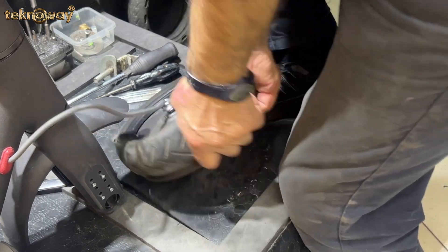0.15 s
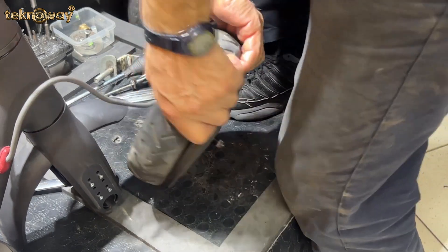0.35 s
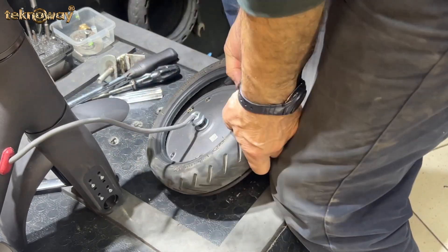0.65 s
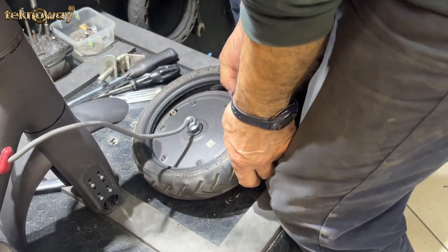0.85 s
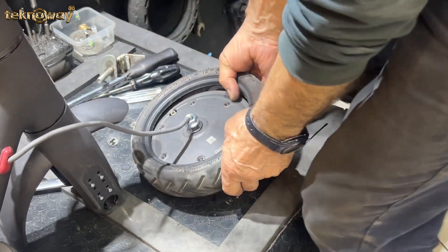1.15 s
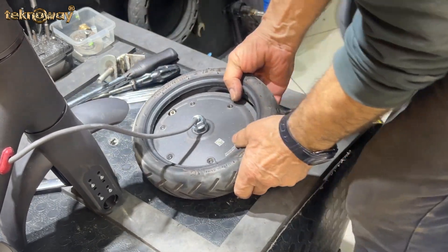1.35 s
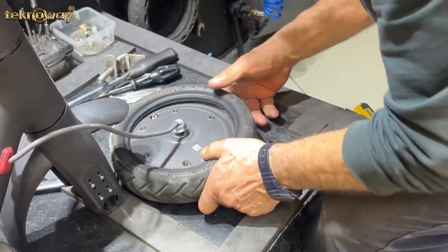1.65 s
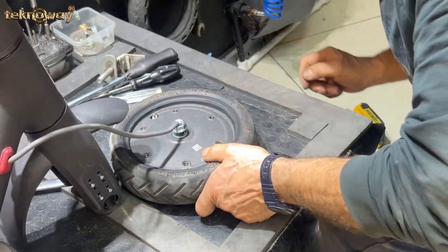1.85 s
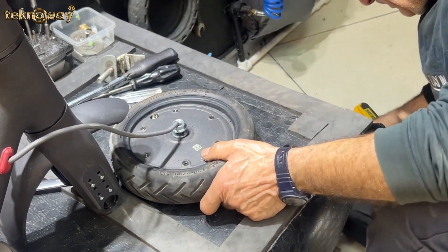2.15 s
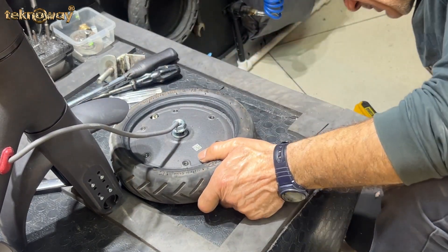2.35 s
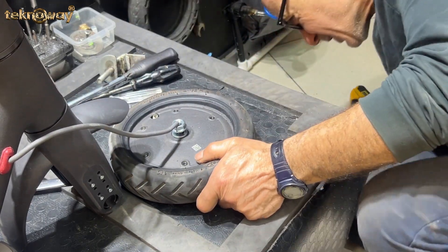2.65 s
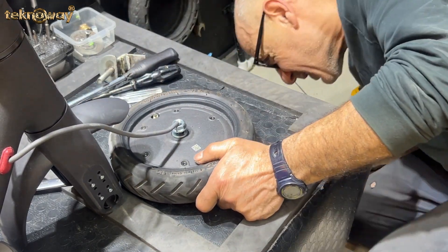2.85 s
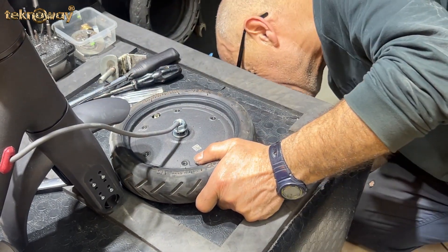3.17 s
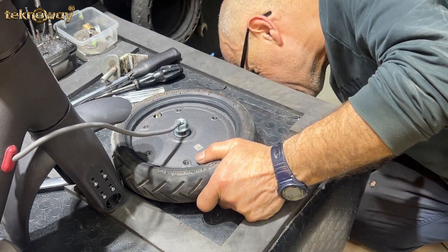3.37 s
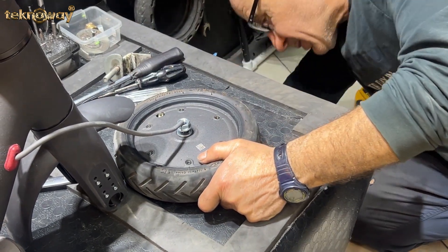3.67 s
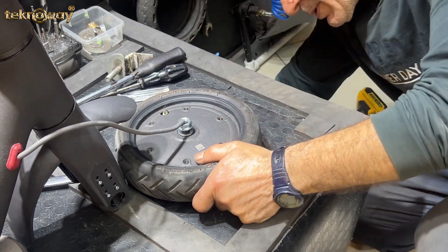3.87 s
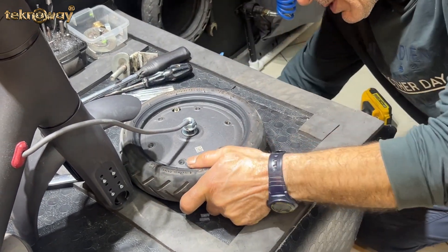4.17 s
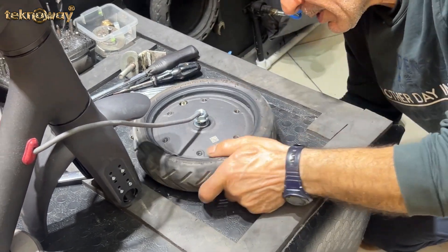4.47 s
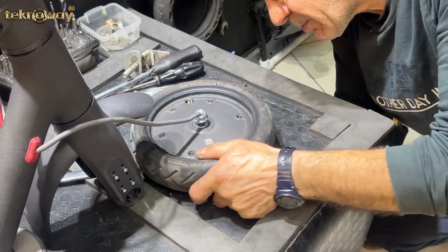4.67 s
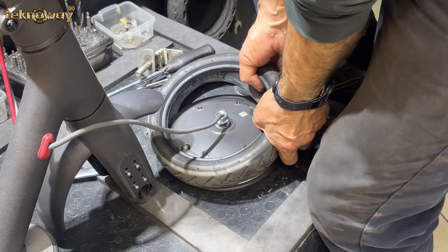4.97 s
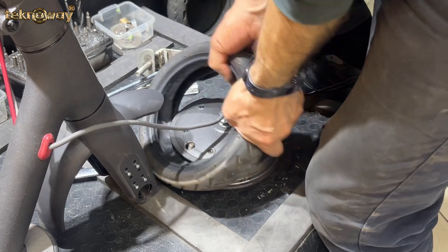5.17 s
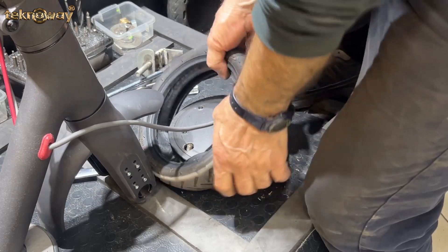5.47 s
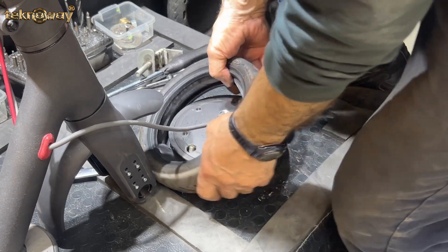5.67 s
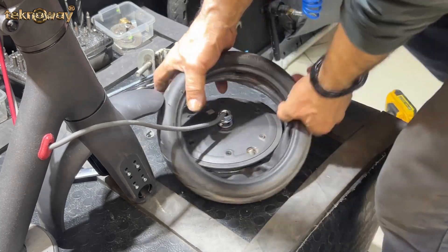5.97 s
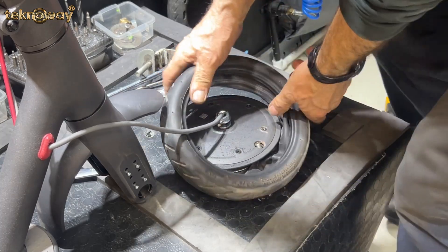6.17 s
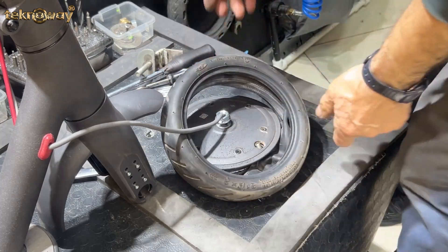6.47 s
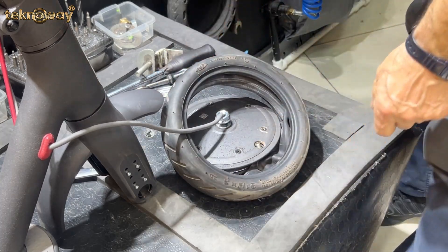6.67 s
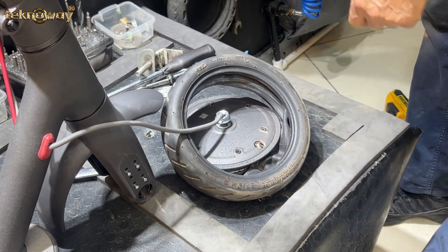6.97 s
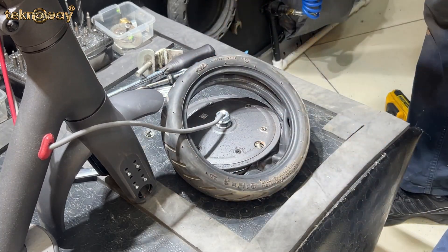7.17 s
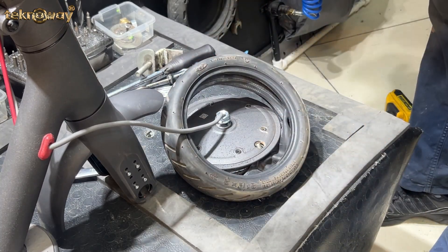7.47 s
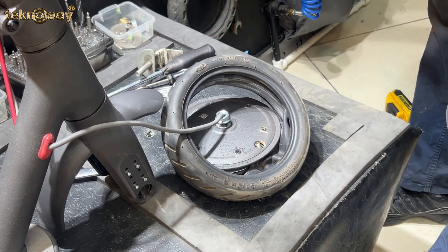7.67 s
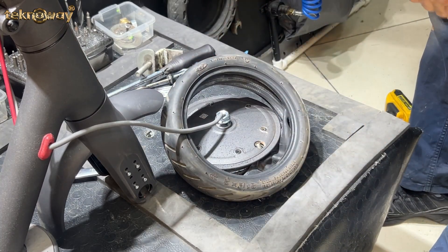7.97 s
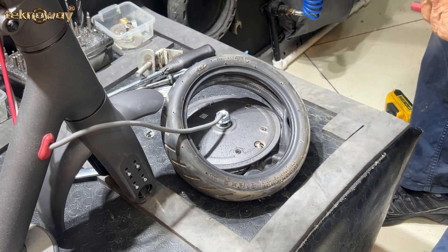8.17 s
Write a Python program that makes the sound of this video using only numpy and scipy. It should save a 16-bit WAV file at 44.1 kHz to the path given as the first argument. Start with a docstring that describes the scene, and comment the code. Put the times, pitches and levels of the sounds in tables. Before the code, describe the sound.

In a small workshop, close stereo microphones catch a wheel being wrestled from its tyre on a rubber-matted hollow bench. A hard crack and boom open, followed by scuffs, bright jingling tools and another heavy thud. A quieter stretch of small ticks leads to renewed clatter, squeak and thumps, then soft rubbing and light knocks over low room rumble.

```python
"""A low room rumble, and almost at once a hard crack and a boom: a small hub wheel is wrestled out of
its tyre on a rubber-matted metal bench in a workshop, before two close microphones.
The wheel thuds on the hollow bench (decaying sines), loose steel tools jingle (resonators woken by clicks),
hard parts knock and tick (short bursts and sines), rubber, cloth and shoes rub and scuff (shaped noise
with small catches), and now and then rubber squeaks (falling sines)."""
import sys
import numpy as np
from scipy import signal
from scipy.fft import rfft, irfft, next_fast_len
from scipy.io import wavfile
from scipy.ndimage import uniform_filter1d

SR = 44100
rng = np.random.default_rng(int(sys.argv[2]) if len(sys.argv) > 2 else 0)


def dump(signal):
    """Clip the signal to [-1, 1] and save it as 16-bit WAV at the path in sys.argv[1]."""
    limited = np.clip(np.atleast_2d(signal).T, -1, 1)
    pcm = np.round(limited * 32767).astype(np.int16)
    wavfile.write(sys.argv[1], SR, pcm)


N = 366912   # length [samples]
STEP = 20    # envelopes are computed on every 20th sample


def from_db(db):
    """Decibels to gain."""
    return 10 ** (np.asarray(db) / 20)


def rms_one(x):
    """Scale to rms 1."""
    return x / np.sqrt(np.mean(x ** 2) + 1e-20)


def at_hz(points, hz):
    """Read a table on a log-frequency axis."""
    table_hz, values = np.array(points).T
    return np.interp(np.log(hz), np.log(table_hz), values)


def highpass(x, hz, order=4):
    """Remove what lies below a frequency."""
    return signal.sosfilt(signal.butter(order, hz, "high", fs=SR, output="sos"), x)


def drift(rate_hz):
    """Slow chance of spread 1: noise through two equal one-pole smoothers, on every 40th sample."""
    r = np.exp(-2 * np.pi * rate_hz * 40 / SR)
    slow = signal.lfilter([1], [1, -2 * r, r * r], rng.standard_normal(N // 40 + 2002))
    slow = rms_one(slow[2000:])   # skip the settling of the smoother
    return np.interp(np.arange(N) / 40, np.arange(len(slow)), slow)


def ring(clicks, hz, t60):
    """A resonator: a unit click sets a decaying sine of starting height 1 ringing."""
    r = from_db(-60 / (t60 * SR))
    w = 2 * np.pi * hz / SR
    return signal.lfilter([0, np.sin(w)], [1, -2 * r * np.cos(w), r * r], clicks + 1e-18)


def add(track, s, sound):
    """Mix a sound in at a time."""
    i = round(s * SR)
    track[i:i + len(sound)] += sound[:N - i]


def gestures(rows):
    """One coarse envelope a row: swell from 20 dB down, hold, die away."""
    start, rise, hold, t60, db = np.array(rows).T[:5, :, None]
    t = np.arange(0, N, STEP) / SR - start
    swell_db = np.minimum(-20 * (1 - t / rise), 0)
    fade_db = -60 * np.maximum(t - rise - hold, 0) / t60
    return from_db(db + np.maximum(swell_db + fade_db, -150)) * (t > 0)


def fill(coarse):
    """From a coarse envelope to all samples."""
    return np.interp(np.arange(N) / STEP, np.arange(len(coarse)), coarse)


def random_clicks(per_s, spread_db):
    """Single clicks at random times, of random sign and uneven strength."""
    strength_db = spread_db * np.minimum(rng.exponential(1, N), 4)
    return (rng.random(N) < per_s / SR) * from_db(strength_db) * rng.choice([-1, 1], N)


def banded_noise(spectrum, tilt_db, patchy_db, grain_db):
    """Half-octave noise bands, each flickering on its own, all sharing a fast grain."""
    edges = 20 * 2 ** np.arange(0, 10.1, .5)
    white = rng.standard_normal((2, N))   # neighbouring bands take different noise
    total_power = sum(from_db(2 * at_hz(spectrum, hz)) * hz for hz in edges)
    out = 0
    for k, (low, high) in enumerate(zip(edges, edges[1:])):
        band = signal.sosfilt(signal.butter(2, [low, high], "band", fs=SR, output="sos"), white[k % 2])
        hz = np.sqrt(low * high)
        level_db = at_hz(spectrum, hz) + tilt_db * np.log2(hz / 1500) + patchy_db * drift(30)
        out = out + band * from_db(level_db)
    return out * from_db(grain_db * drift(130)) * np.sqrt(SR / total_power)


# Colour of the workshop air before its overall level: (frequency [Hz], density [dB per Hz])
ROOM_TONE = [(12, -38), (20, -9.5), (65, 7.5), (107, 1), (182, -4), (459, -12), (1150, -39), (2460, -37),
             (7950, -48), (11100, -55), (14700, -55), (16000, -46)]
ROOM_TONE_DB = -51


def room_tone():
    """The low rumble of the room: coloured noise whose bands flicker separately."""
    return from_db(ROOM_TONE_DB) * banded_noise(ROOM_TONE, 0, patchy_db=4, grain_db=0.04)


# Decay of the workshop's echoes: (frequency [Hz], t60 [s])
SHOP_T60 = [(100, 0.5), (1000, 0.25), (8000, 0.22)]


def shop(x):
    """Echoes of the workshop: ten feedback delays, their loss following the decay table."""
    size = next_fast_len(N + SR)
    hz = np.fft.rfftfreq(size, 1 / SR) + 1
    echoes = 0
    for k, lag in enumerate(rng.uniform(.015, 0.053, 10)):
        loop = from_db(-60 * lag / at_hz(SHOP_T60, hz)) * np.exp(-2j * np.pi * hz * lag)
        echoes = echoes + (-1) ** k * loop / (1 - loop)
    return irfft(rfft(x, size) * echoes, size)[:N]


# Resonances of the hub wheel: (frequency [Hz])
WHEEL_HZ = [470, 630, 950, 1240, 1550, 1750, 1950, 2340, 2900]


def grit():
    """Uneven small catches, each ringing one resonance of the wheel for 22 cycles (t60); rms 1."""
    catches = random_clicks(per_s=600, spread_db=4.0)
    dealt = rng.integers(0, len(WHEEL_HZ), N)
    return rms_one(sum(ring(catches * (dealt == k), hz, 22 / hz) for k, hz in enumerate(WHEEL_HZ)))


def bench_rumble():
    """The bench shaking: noise through three low resonances; rms 1."""
    shake = rng.standard_normal(N)
    low, middle, high = ring(shake, 125, 0.035), ring(shake, 230, 0.031), ring(shake, 370, 0.017)
    return rms_one(low + from_db(-0.5) * middle + from_db(-8) * high)


# Rubber, cloth and soles sliding:
# (start [s], rise [s], hold [s], fade t60 [s], level [dB], tilt [dB per octave])
RUBS = [(0.097, 0.0054, 0.006, 0.48, -24.5, -2), (0.235, 0.038, .005, 4.6, -38.5, 0),
        (0.463, 0.016, 0.0034, 0.14, -27.5, -2), (0.494, 0.087, 0.19, 1.37, -34.5, -2.5),
        (0.702, .11, 0.15, 0.28, -31, 0), (1.021, 0.05, 0.031, 0.23, -32, 1),
        (1.445, 0.097, 0.051, 0.085, -53, 5.5), (1.542, .01, 0.0059, 0.16, -53, -3.5),
        (1.554, 0.021, 0.066, 1.2, -58, 1), (2.192, .2, 0.19, 2.6, -49.5, 4.5),
        (2.71, 0.052, 0.02, 1.7, -60, -9), (2.799, 0.13, 0.47, 0.22, -66, 6),
        (3.595, 0.018, 0.21, 0.28, -41.5, -1), (3.731, 0.02, 0.013, 0.48, -26, -1),
        (4.02, 0.059, 0.059, .2, -51.5, 0), (4.12, 0.02, 0.0076, 0.71, -40, -1),
        (4.247, 0.05, 0.021, 0.58, -47.5, 3), (4.434, 0.011, 0.1, 0.28, -51.5, 3),
        (4.623, 0.094, 0.011, 0.45, -47, 1), (4.834, 0.053, 0.021, 0.053, -54.5, 2.5),
        (4.959, 0.0071, 0.0081, 0.19, -51, 0.5), (5.024, 0.0029, 0.0069, 0.21, -49, 0.5),
        (5.079, 0.04, .01, 0.097, -41, -1), (5.137, 0.02, 0.006, 0.44, -37, -0.5),
        (5.188, .01, 0.008, 9, -59, 0.5), (5.509, 0.18, .05, .2, -57, -1.5),
        (5.686, .01, 0.034, 0.58, -40, 4), (5.809, 0.091, 0.08, 0.33, -45, -0.5),
        (6.13, .008, 0.065, 0.24, -55, 0.5), (6.268, 0.043, 0.008, 0.19, -53.5, 0),
        (6.64, 0.059, 0.3, 0.55, -58, 5), (7.028, 0.0088, 0.018, 0.13, -46.5, -6),
        (7.035, 0.047, 0.053, 0.32, -31, 2.5), (7.513, 0.0062, 0.0053, 0.25, -62, -6),
        (7.803, 0.1, 0.18, 0.33, -48.5, 0.5), (8.163, 0.052, 0.11, 0.4, -54, 2)]
# Colour of the friction before each stroke's tilt: (frequency [Hz], density [dB per Hz])
RUB_COLOUR = [(150, -38), (250, -22.5), (436, 2.5), (674, -8.5), (1200, -8), (1760, -11), (2090, -15),
              (5250, -19.5), (7440, -22.5), (16000, -32)]
GRIT_DB, RUB_SHAKE_DB = -6, -6   # catches and bench shake against the stroke, at zero tilt
SHAKE_RISE_S, SHAKE_T60_S = 0.011, 0.33   # bench shake after a thud


def rubbing():
    """Friction noise coloured by the loudest stroke; strokes and thuds leave the bench shaking."""
    strokes = gestures(RUBS) + 1e-9
    level = np.sqrt(np.sum(strokes ** 2, axis=0))
    tilt_db = np.array(RUBS)[:, -1] @ strokes ** 2 / level ** 2   # power-weighted
    fine_tilt_db = fill(tilt_db)
    friction = banded_noise(RUB_COLOUR, fine_tilt_db, patchy_db=1.5, grain_db=1.0)
    catches = from_db(GRIT_DB - 1.9 * fine_tilt_db) * grit()   # dull strokes are the grittier
    friction = fill(level) * (friction + catches)

    after = gestures([(s, SHAKE_RISE_S, 0, SHAKE_T60_S, db) for s, *_, db in THUDS]).sum(axis=0)
    stroke_shake = from_db(RUB_SHAKE_DB - 1.9 * tilt_db) * level   # dull strokes shake the bench more
    rumble = fill(after + stroke_shake) * bench_rumble()
    return highpass(friction, 240) + highpass(rumble, 70)


# Strokes that sound through a hollow, and first the ringing of a knocked part at 1110 Hz:
# (start [s], rise [s], hold [s], fade t60 [s], level [dB], resonance [Hz], width [Hz])
RESONANT_NOISES = [(0.249, .006, 0.013, .05, -28.5, 1110, 30), (2.327, 0.072, 0.3, 0.43, -56.5, 3980, 500),
                   (6.644, 0.037, 0.33, 0.36, -59, 2590, 696),
                   (6.656, 0.079, 0.23, 0.33, -54.5, 3860, 1200),
                   (7.037, 0.027, 0.11, 0.26, -36.5, 415, 69.3), (7.066, 0.024, 0.058, 0.28, -40, 1202, 80),
                   (7.065, 0.021, 0.054, 0.2, -39, 2036, 140)]


def part_ring_and_hollow_rubs():
    """Grainy noise through one resonance a row: first a knocked part ringing, then hollow strokes."""
    grain = rng.standard_normal(N) * from_db(3 * drift(90))
    out = np.zeros(N)
    for level, (*_, hz, width) in zip(gestures(RESONANT_NOISES), RESONANT_NOISES):
        t60 = np.log(1000) / (np.pi * width)
        out += fill(level) * rms_one(ring(grain, hz, t60))
    return out


# Rubber squeaks; the level falls 18 dB in one length, give or take the catching:
# (time [s], from [Hz], towards [Hz], length [s], level [dB])
SQUEAKS = [(1.539, 7430, 7060, 0.053, -36), (5.158, 7100, 6520, 0.082, -38.5)]


def squeaks():
    """Stick-slip whistles, rough and broken, sagging in pitch as the rubber slows."""
    out, waver, catch = np.zeros(N), drift(150), drift(60)
    for s, from_hz, to_hz, length, db in SQUEAKS:
        t = np.arange(round(3.7 * length * SR)) / SR
        hz = to_hz + (from_hz - to_hz) * np.exp(-2.5 * t / length) + 160 * waver[:len(t)]
        fade = (1 - np.exp(-t / 0.014)) * from_db(-18 * t / length + 10 * catch[:len(t)])
        add(out, s, from_db(db) * np.sin(2 * np.pi * np.cumsum(hz) / SR) * fade)
    return out


# Small sharp ticks, each with a soft or fainter hollow blip:
# (time [s], click level [dB], click [Hz], blip level [dB])
TICKS = [(2.663, -21, 1500, -60), (3.309, -47, 2500, -44), (3.355, -44, 3000, -50),
         (3.408, -47, 3400, -43.5), (3.507, -42.5, 3500, -41.5), (3.755, -14, 1900, -40.5),
         (5.174, -16, 1830, -31), (5.973, -34, 1500, -42), (6.563, -56, 2000, -72)]
TICK_T60_S, BLIP_HZ, BLIP_PEAK_S = 0.0047, 547, 0.0053


def ticks():
    """A click that barely rings, and a low blip that swells and dies."""
    out, t = np.zeros(N), np.arange(SR // 10) / SR
    swell = (t / BLIP_PEAK_S * np.exp(1 - t / BLIP_PEAK_S)) ** 2
    blip = np.sin(2 * np.pi * BLIP_HZ * t) * swell
    for s, db, hz, blip_db in TICKS:
        click = from_db(db - 60 * t / TICK_T60_S) * np.cos(2 * np.pi * hz * t)
        add(out, s, click + from_db(blip_db) * blip)
    return out


# Loose tools set shaking against each other:
# (start [s], rise [s], hold [s], fade t60 [s], level [dB], favoured pitch [Hz])
JINGLES = [(0.458, .003, 0.008, 0.19, -25, 7400), (0.495, .01, 0.064, 0.4, -43, 6190),
           (0.5, .02, 0.087, 0.31, -43, 4264), (0.798, 0.028, 0.015, 0.27, -40, 11200),
           (.6, 0.021, 0.041, 0.45, -38, 2480), (0.717, 0.02, 0.22, 0.43, -47, 3200),
           (0.762, 0.039, 0.085, 0.28, -32.5, 4460), (0.79, 0.024, 0.051, 0.49, -43, 6190),
           (0.828, .02, 0.21, 0.49, -50, 2540), (1.011, 0.051, 0.078, 0.22, -41.5, 3350),
           (3.613, 0.016, 0.0031, 0.097, -44, 4540), (3.7, 0.0045, 0.057, 0.28, -35.5, 11500),
           (3.793, 0.024, 0.12, 0.3, -44.5, 3110), (3.943, 0.012, .003, 0.038, -45, 7550),
           (4.107, 0.027, 0.0039, 0.12, -41.5, 4560)]
# Blows on the loose steel tools: (time [s], level [dB], favoured pitch [Hz])
CLINKS = [(0.091, -31, 4960), (0.214, -33, 2700), (0.241, -26, 3080), (.287, -27.5, 8280),
          (0.46, -23, 7660), (0.471, -10.5, 7590), (0.476, -17.5, 7850), (0.478, -14, 10900),
          (.577, -23, 6080), (0.827, -20, 2520), (1.082, -26.5, 4340), (3.698, -27.5, 2900),
          (3.728, -16.5, 2766), (3.749, -25, 7340), (3.75, -36, 4560), (3.765, -29, 3830),
          (3.863, -36, 11700), (3.86, -36, 3110), (3.952, -39, 3110), (4.111, -33, 4560),
          (4.116, -26.5, 1940), (4.14, -37, 2930), (4.142, -40, 3250), (4.141, -40, 3830),
          (5.698, -23, 6600), (7.793, -44, 2590)]
# Modes of the tools: (frequency [Hz], width [Hz] that sets t60, level before the treble lift [dB])
STEEL = [(1940, 24, -8), (2475, 22, -4), (2690, 23, -6), (2930, 25, -5), (3110, 32, -4), (3245, 20, -5),
         (3830, 49, -9), (4278, 30, -2), (4560, 26, -6), (4960, 39, -6), (5860, 85, -9), (6190, 30, -4),
         (6540, 42, -4), (6850, 36, -9), (7170, 30, -7), (7400, 65, -6), (7750, 61, -9), (8060, 38, -14),
         (8690, 55, -10), (9020, 47, -9), (9230, 31, -8), (9850, 70, -10), (10820, 60, -5),
         (11400, 50, -11), (11700, 62, -7), (12500, 37, -15), (13600, 33, -16), (14400, 46, -11),
         (14900, 34, -14)]
RING_FACTOR = 4.7   # t60 [s] = factor / width [Hz]
# modes away from the favoured pitch are weaker, down to a limit
FAVOUR_DB_PER_OCTAVE, SHAKEN_SPAN_DB, STRUCK_SPAN_DB = 129.5, 12, 24


def off_pitch_db(hz, favoured_hz, span_db):
    """How much weaker a mode is for lying away from the favoured pitch."""
    return np.minimum(FAVOUR_DB_PER_OCTAVE * np.abs(np.log2(hz / favoured_hz)), span_db)


def steel():
    """Touches and blows ring the tools' modes, mostly near a favoured pitch; width sets the ring time."""
    shaking = gestures(JINGLES)
    shaken_hz = np.array(JINGLES)[:, -1]
    touches = random_clicks(per_s=1400, spread_db=2.4)
    dealt = rng.integers(0, 4, N)   # each touch wakes a quarter of the modes
    blow_s, blow_db, struck_hz = np.transpose(CLINKS)
    blow_at = np.round(blow_s * SR).astype(int)
    strengths_db = rng.normal(0, 1.0, (len(CLINKS), len(STEEL)))
    delays = rng.integers(0, 260, strengths_db.shape)   # a blow chatters for six milliseconds
    out = 0
    for k, (hz, width, db) in enumerate(STEEL):
        level = fill(from_db(-off_pitch_db(hz, shaken_hz, SHAKEN_SPAN_DB)) @ shaking)
        clicks = level * touches * (dealt == k % 4) * from_db(db + 4.5 * drift(14))
        struck_db = blow_db - off_pitch_db(hz, struck_hz, STRUCK_SPAN_DB) + strengths_db[:, k]
        clicks[blow_at + delays[:, k]] += from_db(struck_db)
        treble_lift = from_db(4.4 * np.log2(hz / 6000))
        out = out + treble_lift * ring(clicks, hz, RING_FACTOR / width)
    return out


# Hard contacts:
# (time [s], crack level [dB], body pitch [Hz], tilt [dB per octave], tail t60 [s], tail level [dB])
KNOCKS = [(0.09, -5, 619, -6, 0.015, 1.5), (0.214, -19.5, 2220, -3, 0.2, -23.5),
          (0.242, -12, 2180, -2, 0.095, -16.5), (0.287, -10.5, 937, -6.5, 0.26, -16.5),
          (0.461, -19.5, 604, -2, 0.27, -25.5), (0.467, -15, 632, 5, 0.73, -24.5),
          (0.552, -23.5, 6400, 0, 0.27, -18.5), (0.577, -22, 6400, -2.5, 0.081, -19.5),
          (0.693, -28.5, 1200, -6.5, 0.12, -24.5), (0.622, -28, 1400, -5.5, 0.16, -19.5),
          (0.829, -28, 2530, -1, 0.33, -22), (1.082, -49, 540, -7.5, 0.34, -38.5),
          (1.533, -14, 500, -10, 0.12, -36), (1.775, -53, 634, 5, 0.058, -40.5),
          (2.743, -51, 570, -3.5, 0.11, -39.5), (3.609, -34, 1165, -14, 0.11, -55.5),
          (3.699, -31.5, 2960, 1, 0.12, -23.5), (3.729, -17, 1200, -4.5, 0.31, -20.5),
          (3.942, -43, 3040, -4, 0.38, -36), (4.115, -18, 1220, -9, 0.15, -22.5),
          (4.14, -20.5, 1340, -6, 0.25, -30), (4.791, -43, 896, -8, 0.033, -44.5),
          (5.101, -42, 890, -3.5, 0.15, -48), (5.135, -18.5, 810, -8.5, 0.035, -18.5),
          (5.173, -14, 1103, -5, 0.036, -24.5), (5.699, -20, 5640, 1, 0.078, -20.5),
          (7.028, -38, 880, -6, .12, -53), (7.346, -46, 1120, -12.5, 0.19, -46.5),
          (7.593, -50.5, 602, 4.5, 0.18, -52), (7.746, -47.5, 1970, -3, 0.67, -57),
          (7.795, -31, 2760, -3, 0.22, -36), (7.854, -42, 726, -9, 0.11, -31),
          (7.949, -33, 1856, 0, 0.053, -42), (8.253, -41, 903, -6, 0.115, -42.5)]
CRACK_T60_S, CRACK_RISE_S, TAIL_RISE_S = 0.01, 0.001, 0.0037
BODY_DB, BODY_CYCLES = 1.5, 17   # body against crack; cycles that lengthen the body's t60
TAIL_RING, TAIL_WIDTH_HZ = 1.7, 40   # how far the wheel's resonances stand out of the noise


def knocks():
    """A crack, a short ring at the pitch of the part struck, and a rough tail of many small resonances."""
    out, size = np.zeros(N), SR // 4
    t, hz = np.arange(size) / SR, np.fft.rfftfreq(size, 1 / SR) + 1
    wheel = sum(1 / np.hypot(1, 2 * (hz - mode_hz) / TAIL_WIDTH_HZ) for mode_hz in WHEEL_HZ)
    band_limits = 1 / (1 + (400 / hz) ** 4) / np.sqrt(1 + (hz / 12000) ** 6)
    for s, db, body_hz, tilt_db, t60, tail_db in KNOCKS:
        lumps = rng.standard_normal(len(hz))   # an uneven spectrum for each knock
        lumps = rms_one(uniform_filter1d(uniform_filter1d(lumps, size=10), size=10))
        colour = from_db(4 * lumps + tilt_db * np.log2(hz / 1500)) * (1 + TAIL_RING * wheel) * band_limits
        burst = rms_one(irfft(rfft(rng.standard_normal(size)) * colour, size))
        crack = from_db(db - 60 * t / CRACK_T60_S)
        tail = from_db(tail_db - 60 * t / t60) * (1 - np.exp(-t / TAIL_RISE_S))
        body_t60 = 0.01 + BODY_CYCLES / body_hz
        body = from_db(db + BODY_DB - 60 * t / body_t60) * np.sin(2 * np.pi * body_hz * t)
        add(out, s, ((crack + tail) * burst + body) * (1 - np.exp(-t / CRACK_RISE_S)))
    return out


# Wheel and hands landing on the bench:
# (time [s], boom level [dB], boom pitch once settled [Hz], panel level [dB], after-shake level [dB])
THUDS = [(0.099, -1, 132.6, -19, -23), (0.286, -30, 122.5, -24.5, -22), (0.494, -3.5, 133.2, -43, -28),
         (0.815, -26.5, 104.6, -41.5, -51), (1.347, -35.5, 124.3, -64, -53.5), (1.536, -1, 122, -17, -12),
         (2.504, -33, 201.8, -63, -38), (2.673, -34, 119.6, -74, -57), (2.744, -27.5, 167.5, -61.5, -32.5),
         (2.826, -31.5, 166.4, -49, -56), (2.903, -31.5, 150.4, -63, -42), (3.603, -36.5, 161, -58, -69),
         (3.729, -19, 149.6, -37, -50), (4.123, -26, 159.2, -50, -59), (4.534, -30.5, 111.2, -52, -42),
         (4.568, -36.5, 117.6, -52.5, -50), (4.796, -31, 98.4, -49, -48), (5.14, -13.5, 183.2, -33, -22),
         (5.153, -7.5, 130, -51, -24.5), (5.203, -15, 96.8, -59, -54), (5.546, -34, 130, -74, -59.5),
         (5.701, -27, 134, -46, -40.5), (6.086, -33.5, 123.5, -60, -47), (6.169, -35, 113, -68, -50),
         (7.03, -33, 260, -39.5, -72), (7.865, -44, 265, -44, -46), (7.946, -28, 174.3, -65, -40.5),
         (8.047, -34, 148, -51, -41), (8.252, -37, 259.4, -40, -51)]
# Panels of the bench, before each blow's own variation: (frequency [Hz], level [dB], t60 [s])
BENCH = [(231.3, -0.5, 0.092), (318.3, 5, 0.13), (405, 1, 0.091), (480.7, 1, 0.16), (527, -10.5, 0.17),
         (631, -6, 0.086), (720, -10.5, 0.059), (853, -12, 0.03), (970, -19.5, 0.096), (1010, -19.5, 0.076),
         (1230, -21.5, 0.092), (1390, -22.5, 0.056)]
BOOM_T60_S = 0.12
LINGER_DB, LINGER_T60_S = -21, 0.89   # the frame of the bench hums on after a boom
BOOM_SAG, BOOM_SAG_S = 0.18, .012   # a boom starts this share sharp and settles


def thuds():
    """A soft blow: the hollow bench booms at a pitch set by the load, and its panels ring."""
    out, t = np.zeros(N), np.arange(SR // 2) / SR
    sagging_t = t + BOOM_SAG * BOOM_SAG_S * (1 - np.exp(-t / BOOM_SAG_S))
    boom_fade = from_db(-60 * t / BOOM_T60_S) + from_db(LINGER_DB - 60 * t / LINGER_T60_S)
    boom_fade *= 1 - np.exp(-t / 0.003)
    for s, db, hz, panel_db, _ in THUDS:
        boom = np.sin(2 * np.pi * hz * sagging_t) * boom_fade
        panels = 0
        for mode_hz, mode_db, mode_t60 in BENCH:
            level_db = mode_db + rng.normal(0, 3.5)   # each blow excites the panels differently
            panels = panels + from_db(level_db - 60 * t / mode_t60) * np.sin(2 * np.pi * mode_hz * t)
        add(out, s, from_db(db) * boom + from_db(panel_db) * panels * (1 - np.exp(-t / 0.0027)))
    return out


# Smeared side signal against the middle: (frequency [Hz], level [dB])
SPREAD = [(60, -28.5), (180, -15), (550, -8), (1650, -11.5), (4970, -9.5), (15000, -5)]


def widen(x):
    """Two close microphones: the side is the sound smeared by scattered echoes."""
    size = next_fast_len(N + 8000)
    hz = np.fft.rfftfreq(size, 1 / SR) + 1
    smear = rng.standard_normal(6000) * from_db(-60 * np.arange(6000) / (.15 * SR))
    smear /= np.sqrt(np.sum(smear ** 2))
    side = irfft(rfft(x, size) * rfft(smear, size) * from_db(at_hz(SPREAD, hz)), size)[:N]
    lows = signal.sosfilt(signal.butter(1, 1500, fs=SR, output="sos"), x)
    side = side + .075 * lows   # lows sit a little left
    return np.array([x + side, x - side])


ECHO_DB = -19   # gain of the workshop's echoes


def scene():
    """All sources on the bench and in the room, heard at the two microphones."""
    hits = squeaks() + ticks() + steel() + knocks() + thuds()
    hits = highpass(hits, 78)   # a small bench radiates no deep bass
    echoes = from_db(ECHO_DB) * shop(hits)
    return widen(room_tone() + rubbing() + part_ring_and_hollow_rubs() + echoes + hits)


def record(dry):
    """The microphone droops in the top octave, overload clips, the top is cut."""
    drooped = signal.sosfilt(signal.butter(2, 13000, fs=SR, output="sos"), dry)
    clipped = np.clip(drooped, -.94, .94)
    top_cut = signal.cheby2(12, 70, 16600, fs=SR, output="sos")   # 70 dB down from 16600 Hz up
    return signal.sosfilt(top_cut, clipped)


dry = scene()
out = record(dry)
dump(out)
```